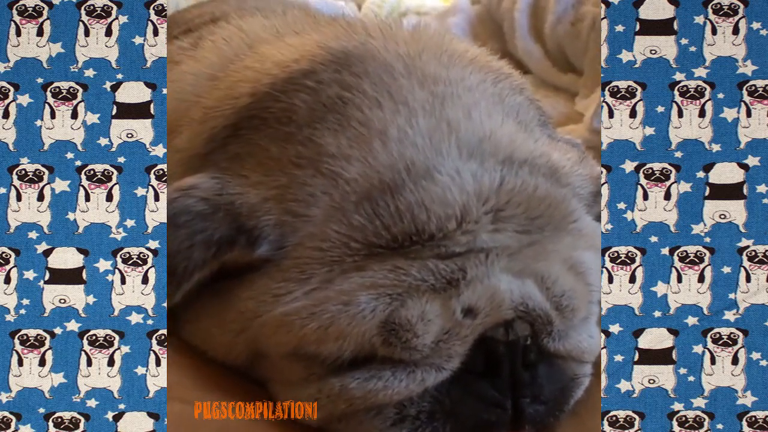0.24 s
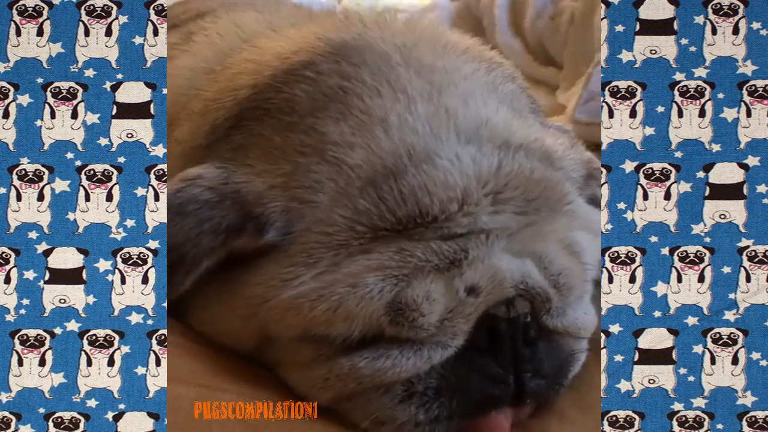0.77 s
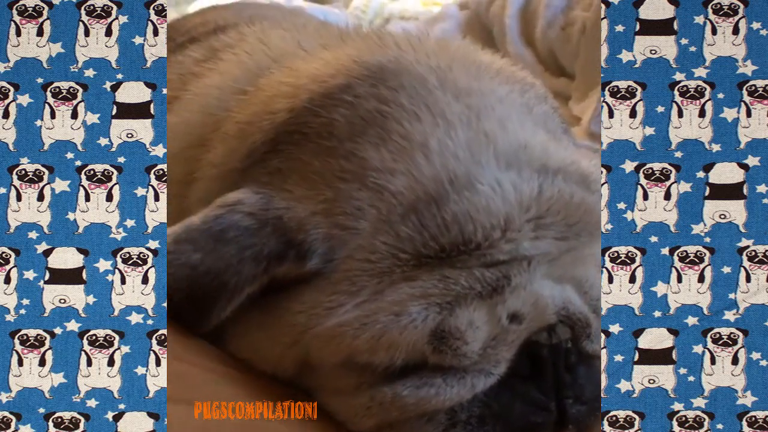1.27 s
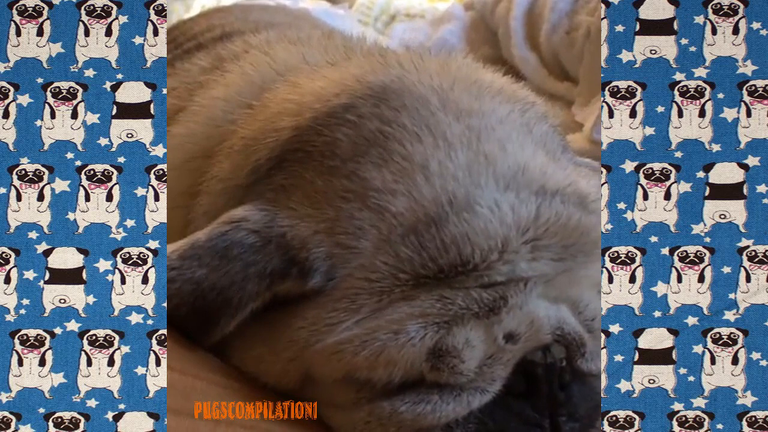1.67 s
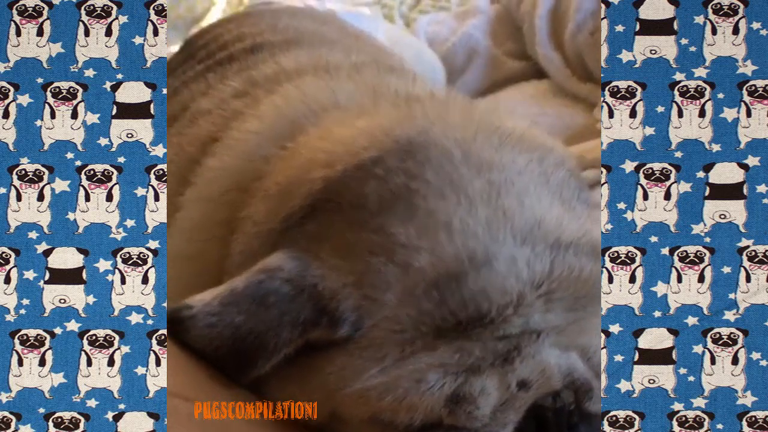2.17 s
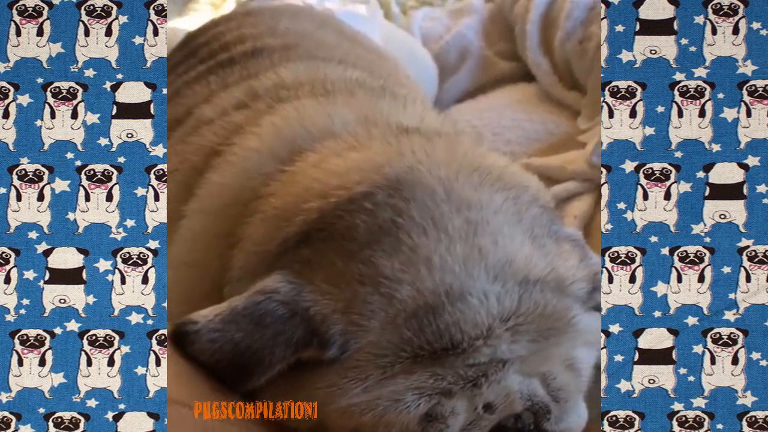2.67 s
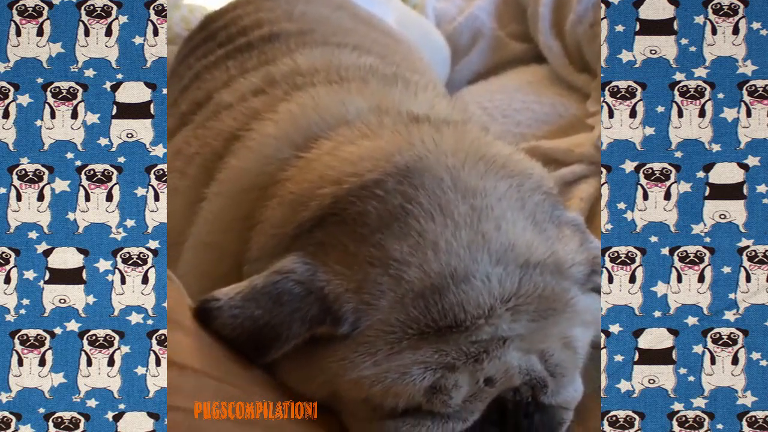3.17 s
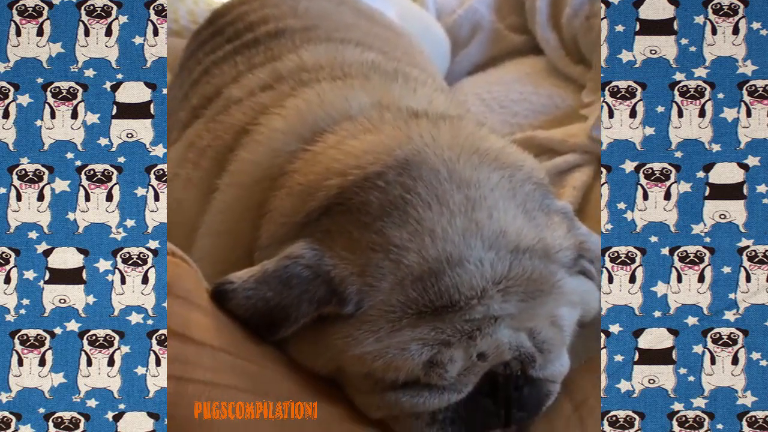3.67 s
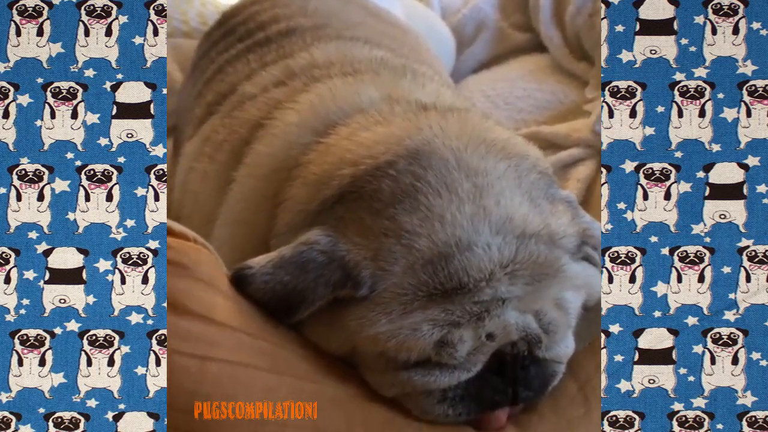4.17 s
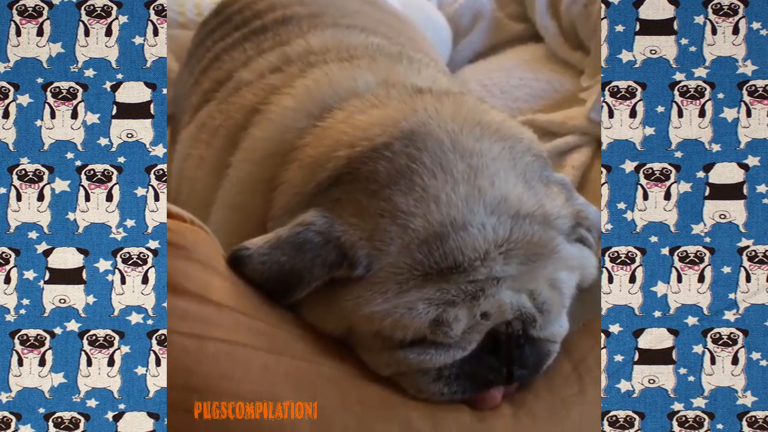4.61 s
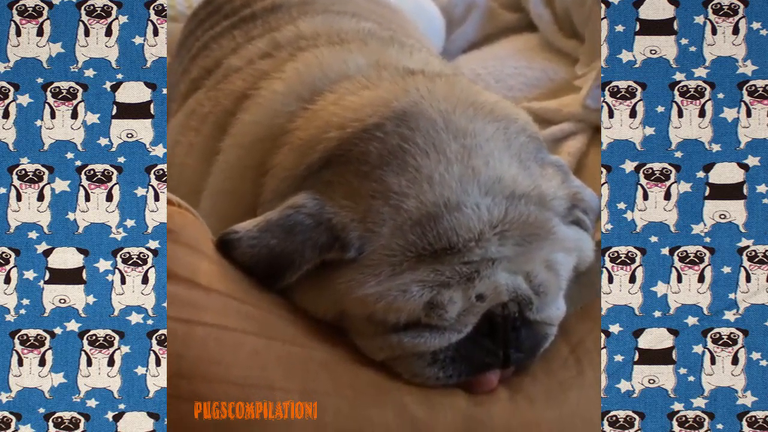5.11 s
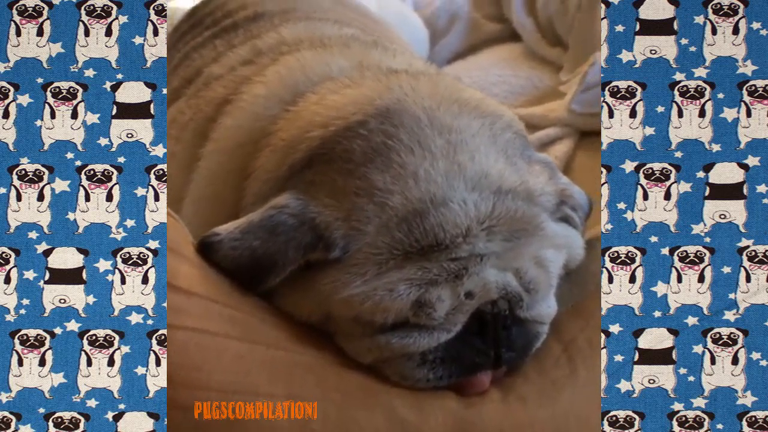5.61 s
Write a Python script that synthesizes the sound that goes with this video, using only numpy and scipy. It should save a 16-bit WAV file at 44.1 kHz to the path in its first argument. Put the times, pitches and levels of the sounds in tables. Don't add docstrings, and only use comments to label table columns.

```python
import sys
import numpy as np
from scipy import signal
from scipy.fft import rfft, irfft, next_fast_len
from scipy.io import wavfile
from scipy.ndimage import uniform_filter1d

SR = 44100
rng = np.random.default_rng(int(sys.argv[2]) if len(sys.argv) > 2 else 0)


def pcm_store(signal):
    levels = np.round(np.clip(np.atleast_2d(signal), -1, 1) * 32767)
    wavfile.write(sys.argv[1], SR, levels.astype(np.int16).T)


def gain_from_db(level_db):
    decades = np.asarray(level_db, float) / 20
    return 10 ** decades


N = 257984
T = np.arange(N) / SR
COARSE = T[::128]
SIZE = next_fast_len(N)
F = np.fft.rfftfreq(SIZE, 1 / SR)


def curves(table):
    s, *columns = np.transpose(table)
    return [np.interp(T, s, c) for c in columns]


def unit(x):
    return x / np.sqrt(np.mean(x ** 2))


def walk(rate):
    hop = 64
    k = int(SR / hop / rate)
    held = np.repeat(rng.standard_normal(N // hop // k + 2), k)
    slewed = uniform_filter1d(uniform_filter1d(held, k), k)
    return np.interp(T, np.arange(len(held)) * hop / SR, unit(slewed))


def beam(s, spread, t=T):
    return np.exp(-.5 * ((t - s) / spread) ** 2)


def swells(rows):
    gain = sum(gain_from_db(db) * beam(s, spread, COARSE) for s, db, spread in rows)
    return np.interp(T, COARSE, gain)


def bumps(rows):
    change_db = sum(db * beam(s, spread, COARSE) for s, db, spread in rows)
    return np.interp(T, COARSE, change_db)


def narrow(bands):
    shape = sum(gain_from_db(db) * np.exp(-2 * ((F - hz) / width) ** 2) for hz, width, db in bands)
    return unit(irfft(rfft(rng.standard_normal(SIZE)) * shape, SIZE)[:N])


def noise(colour, flicker_db, rate):
    hz, db = np.transpose(colour)
    octave = np.log2(np.maximum(F, 1))
    colour_db = np.interp(octave, np.log2(hz), db, left=-99, right=-99)
    spectrum = rfft(rng.standard_normal(SIZE)) * gain_from_db(colour_db)
    out = 0
    for centre in np.arange(np.log2(hz[0]), np.log2(hz[-1]) + 1 / 3, 1 / 3):
        band = np.clip(1 - 3 * np.abs(octave - centre), 0, 1)
        out = out + irfft(spectrum * band, SIZE)[:N] * gain_from_db(flicker_db * walk(rate))
    return unit(out)


def tone(hz, wobble, flutter_db, rate):
    phase = 2 * np.pi * (np.cumsum(hz) / SR + rng.random()) + wobble * walk(rate)
    return np.sqrt(2) * np.sin(phase) * gain_from_db(flutter_db * walk(rate))


# [start_s, level_db, spread_s]
INSECT_PHRASES = [
    (.04, -75.5, 0.066),
    (.2, -74, .02),
    (.35, -77, 0.063),
    (.62, -74, 0.17),
    (1.0, -82, .1),
    (1.3, -77.5, .1),
]
# [pitch_hz, width_hz, level_db]
WING_BANDS = [
    (10000, 750, 1),
    (6600, 800, -3),
    (13200, 1200, -7),
]


def insect():
    throb = gain_from_db(2.5 + 1.5 * walk(11.5))
    fade = np.clip((1.5 - T) / .15, 0, 1)
    return swells(INSECT_PHRASES) * throb * fade * narrow(WING_BANDS)


# [start_s, level_db, pitch_hz, fade_by_60_db_s, pitch_fall_hz_per_s]
ROOM_KNOCKS = [
    (0.0011, -32.5, 466, 0.028, 10),
    (.088, -40, 410, 0.26, 1540),
    (.001, -36, 704, .03, 10),
    (.181, -37, 600, 0.038, 10),
    (1.611, -30.5, 1080, 0.029, 10),
    (1.208, -36, 1040, .06, 10),
    (1.33, -38, 1020, .07, 10),
    (1.56, -42, 990, .07, 10),
]


def knocks():
    out = 0
    for s, db, hz, t60, fall in ROOM_KNOCKS:
        age = np.maximum(T - s, 0)
        swell = 1 - np.exp(-age / .003)
        ring = np.sin(2 * np.pi * (hz - fall * age / 2) * age)
        out = out + gain_from_db(db - 60 * age / t60) * swell * ring
    return out


# [time_s, level_db]
CAR_PASS = [
    (0, -65.5),
    (.4, -57),
    (.9, -50.5),
    (1.4, -53),
    (1.8, -53),
    (2.2, -55),
    (5.85, -90),
]
# [pitch_hz, level_db_per_hz]
CAR_COLOUR = [(600, -28), (950, -1.5), (1100, 0), (1400, -2.5), (1900, -14.5), (3000, -19), (4500, -34)]


def car():
    return gain_from_db(curves(CAR_PASS)[0]) * noise(CAR_COLOUR, flicker_db=1.5, rate=8.6)


# [pitch_hz, width_hz,
# level_db, loudest_s, spread_s]
TREAD_HUMS = [(1420, 74, -56, 1.01, 0.11), (1205, 50, -58, 0.8, 0.15), (1005, 77, -53.5, 1.24, 0.091),
              (1370, 45, -66, 1, .15), (984, 80, -56, 0.77, .08), (1830, 100, -65, 0.87, .1),
              (950, 140, -52, 2.65, 0.26), (1000, 99, -51.5, 3.1, 0.21), (3760, 630, -58, 3.04, 0.13),
              (580, 130, -52, 3.62, 0.2), (634, 130, -59, 5.73, 0.59), (300, 62, -54.5, 0.24, 0.054),
              (2720, 660, -66, 4.66, 0.47), (1000, 500, -53, 3.5, 0.21), (1160, 530, -50.5, 4.04, 0.18),
              (354, 71, -50.5, 3.4, .15), (850, 430, -62.5, 5.9, 0.46), (290, 53, -53, 1.02, 0.1),
              (260, 70, -47, 2.75, 0.11), (1490, 500, -58, 2.33, .2), (2600, 610, -64, 4.15, .25),
              (36, 18, -59, 5.2, .3), (36, 18, -63, .4, .3), (1000, 180, -51.5, 3.28, .08),
              (850, 250, -52, 3.5, .1), (1195, 40, -58, .87, .05), (1400, 200, -60, 1.28, .07),
              (550, 200, -53, 3.95, .06), (1750, 200, -61, 3.4, 0.11), (2310, 300, -64, 3.3, .3),
              (230, 50, -44, 2.7, .04), (600, 200, -58, 4.7, .2), (212, 25, -49.5, 5.62, 0.14),
              (1540, 440, -56, 3.92, 0.11), (1060, 160, -62, 3.5, .06), (270, 50, -49, 2.72, 0.053),
              (1020, 37, -56, 1.34, .06), (1000, 300, -59.5, 1.9, .12), (60, 14, -46, 2.95, .07),
              (42, 16, -46, 3.41, .04)]


def treads():
    return sum(gain_from_db(db) * beam(s, spread) * narrow([(hz, width, 0)]) for hz, width, db, s, spread in TREAD_HUMS)


# [time_s, level_db below its closest approach]
NEARNESS = [(0, -17.5), (.7, -13), (1.3, -10.5), (1.8, -9.5), (2.3, -5), (2.7, -0.5), (3.05, -1), (3.5, -1),
            (3.8, -3.5), (4.2, -7.5), (5.0, -14), (5.85, -18.5)]
LAYER_LEVELS = {"low": (-52, 0.57, 0.01), "octave": (-61, 0.58, 0.01), "whine": (-75, 0.54, .01),
                "rumble": (-44.5, 0.68, .1), "roar": (-42.5, 0.51, .05), "tread": (-46, 0.79, 0.17),
                "hiss": (-54.5, 0.98, .01)}


def follow(name):
    top_db, slope, lag = LAYER_LEVELS[name]
    s, db = np.transpose(NEARNESS)
    return top_db + slope * np.interp(T - lag, s, db)


# [pitch_hz, level_db_per_hz]
RUMBLE_COLOUR = [(20, -15), (40, -7.5), (60, -3.5), (110, -5.5), (160, -15.5)]
ROAR_COLOUR = [(70, -9.5), (110, -1.5), (170, -2.5), (240, 2), (300, -10.5), (450, -19.5), (600, -34)]
TREAD_COLOUR = [(180, -32), (300, -2.5), (336, -11), (408, -4), (539, -6.5), (988, -8), (1120, -10),
                (1740, -13), (3500, -27.5), (4550, -36), (7700, -120)]
HISS_COLOUR = [(1290, -55), (2200, -1.5), (2360, -0.5), (3160, -11), (3960, -6), (6060, -9.5), (6910, -13),
               (12200, -22), (14000, -27)]
# [time_s, change_db, spread_s]
BODY_LURCHES = [(.03, -8, .1), (1.16, -5, .05), (2.0, 3.5, 0.11), (2.41, -4, .05), (2.7, 8, 0.046),
                (2.81, -9, .03), (2.93, 5, .07), (3.39, 7, 0.048), (3.5, -14, .03), (3.68, -7, .04),
                (3.89, -8, .05), (4.12, -15, 0.032), (4.35, -11, 0.033), (4.5, 4, .15), (5.65, 3, .03),
                (5.78, 4, .03)]
# [time_s, change_db, spread_s]
EXHAUST_GULPS = [(.07, -3.5, .04), (.31, 3, 0.076), (1.16, 1, 0.042), (1.9, 1.5, .03), (2.52, 4.5, .03),
                 (2.69, 4, 0.023), (3.5, 7, 0.043), (3.68, 2.5, 0.026), (3.76, -4, 0.027),
                 (4.12, -8, 0.027), (4.2, 2, .03), (4.42, -7.5, 0.24), (5.4, 3, 0.12), (5.65, -1, .08)]
# [time_s, change_db, spread_s]
TARMAC_PATCHES = [(.5, 1.5, 0.18), (.95, -1, .08), (1.32, 2.5, 0.05), (2.0, -1, 0.14), (2.55, 0, .05),
                  (2.75, -1, .06), (3.1, 1, .08), (3.38, 1.5, 0.046), (3.6, -0.5, 0.11), (4.2, 1, 0.03),
                  (4.12, -1.5, .04)]


def road():
    tarmac_db = bumps(TARMAC_PATCHES)
    rumble_db = follow("rumble") + bumps(BODY_LURCHES)
    roar_db = follow("roar") + bumps(EXHAUST_GULPS)
    tread_db = follow("tread") + 0.26 * tarmac_db
    hiss_db = follow("hiss") + tarmac_db
    out = gain_from_db(rumble_db + 3.5) * noise(RUMBLE_COLOUR, flicker_db=1.3, rate=9)
    out += gain_from_db(roar_db + 1.5) * noise(ROAR_COLOUR, flicker_db=1.5, rate=12)
    out += gain_from_db(tread_db + 5.5) * noise(TREAD_COLOUR, flicker_db=1.5, rate=8)
    grain_db = .4 * walk(18)
    out += gain_from_db(hiss_db + 2.5 + grain_db) * noise(HISS_COLOUR, flicker_db=1.1, rate=15)
    near_db = 1.63 * (hiss_db - hiss_db.max())
    return out + gain_from_db(near_db - 63.5 + 1.5 * walk(16)) * narrow([(11500, 10500, 0)])


WHINE_MULTIPLES = [
    3.105,
    3.33,
    3.548,
    3.98,
]
# [time_s, level_db, spread_s]
WHINE_SWELLS = [
    [(.8, -62, 0.09), (1.35, -60, 0.23), (2.0, -57, 0.13), (2.45, -49.5, 0.13), (2.78, -47.5, 0.13),
     (3.5, -52.5, 0.12), (3.77, -43, .1), (4.22, -47.5, 0.11), (4.55, -55.5, 0.14), (5.0, -50, 0.11),
     (5.55, -59, 0.18), (5.85, -49, 0.05)],
    [(1.0, -60.5, 0.084), (2.0, -59, 0.13), (2.6, -61, 0.11), (3.3, -62, .15), (3.73, -43.5, .13),
     (4.0, -53, .1), (4.33, -51, 0.14), (4.75, -53.5, .17), (5.8, -56, 0.072)],
    [(1.0, -65, .1), (1.75, -55.5, .13), (2.45, -52, 0.27), (3.7, -53.5, 0.23), (4.1, -53, 0.22),
     (4.85, -58, 0.13), (5.55, -59, 0.11)],
    [(1.1, -64, .3), (2.0, -62, .1), (3.3, -68, .15), (3.82, -50.5, 0.13), (4.25, -54.5, 0.25),
     (4.8, -62, .08), (5.2, -61, .08)],
]
# [multiple of the firing rate, level_db, loudest_s, spread_s]
PASSING_PARTIALS = [(4 / 3, -57, 1.3, 1.1), (4 / 3, -48, 2.4, .12), (4 / 3, -49, 4.2, .5),
                    (5 / 3, -51, 2.9, .5), (5 / 3, -53, 4.55, .12), (5 / 3, -51, 5.25, .25),
                    (.45, -47, 2.7, .25), (1 / 3, -48, 3.2, .25), (1.78, -51, 1.1, .35),
                    (2.5, -57, 1.2, .2), (2.23, -57, 5.0, .35), (4.7, -53, 3.7, .12), (4.98, -57, 4.1, .25),
                    (4.75, -65, 5.2, .4), (6.8, -57, 4.1, .25), (10.9, -60, 3.7, .2),
                    (12.27, -56, 4.25, .22), (13.55, -58, 3.55, .15), (13.73, -61, 4.15, .25),
                    (17.1, -63, 4.2, .22), (18.45, -61, 3.8, .1)]


def gears(hz):
    out = 0
    for multiple, rows in zip(WHINE_MULTIPLES, WHINE_SWELLS):
        gain = gain_from_db(follow("whine")) + swells(rows)
        out = out + gain * tone(hz * multiple, wobble=.2, flutter_db=1.6, rate=12)
    for multiple, db, s, spread in PASSING_PARTIALS:
        out += gain_from_db(db) * beam(s, spread) * tone(hz * multiple, wobble=.9, flutter_db=2.5, rate=22)
    return out


# [time_s, level_db]
FIRING_LEVEL = [(0, -65), (.2, -49.5), (.35, -42), (.62, -51), (.8, -48.5), (.9, -38), (1.15, -44.5),
                (1.42, -37.5), (1.7, -40), (2.0, -38), (2.4, -29), (2.5, -29.5), (2.95, -20.5), (3.2, -28),
                (3.5, -25.5), (3.8, -32), (4.95, -33), (5.15, -43.5)]
# [time_s, change_db, spread_s]
ECHO_NULLS = [(.7, 4, .04), (1.29, -14, 0.057), (2.1, -12.5, 0.031), (3.29, -18, 0.047),
              (4.12, -4.5, 0.079), (4.5, -5.5, .05), (4.7, 2, 0.061), (5.3, -1, 0.029), (5.7, 4, 0.21)]
# [time_s, firing_swell_db, thump_db]
ROAD_JOLTS = [(2.68, 3.5, -34), (2.745, 4, -36), (2.82, 2, -46), (2.886, 4, -25), (2.97, 3.5, -36),
              (3.02, 2, -36), (3.42, 0.5, -37), (3.49, -1, -36), (3.97, 4, -38), (4.21, 3, -43),
              (1.39, 4.5, -42), (3.35, 3, -33), (3.53, -4, -50), (3.58, 1.5, -36), (4.26, -3, -48),
              (4.35, 2, -45), (4.45, 3, -44), (4.51, 0.5, -50), (4.91, 3.5, -36), (2.40, 1.5, -41)]
# [time_s, level_db, spread_s]
TWO_THIRDS_SWELLS = [(.2, -53, 0.22), (.7, -50.5, 0.099), (.97, -45, .09), (1.2, -43, 0.07),
                     (1.43, -41.5, 0.082), (2.02, -43, 0.08), (2.19, -37, .05), (2.42, -38, 0.07),
                     (2.72, -39, 0.16), (3.2, -33.5, 0.08), (3.38, -32.5, .06), (3.72, -41, 0.065),
                     (4.0, -49, 0.03), (4.32, -47, 0.079), (4.69, -40, 0.094), (4.93, -42, 0.073),
                     (5.15, -46.5, 0.12), (5.5, -53, .07)]
OCTAVE_TONE_SWELLS = [(.85, -52.5, 0.1), (1.2, -46.5, 0.039), (1.5, -50.5, .05), (1.9, -43, 0.076),
                      (2.09, -45, 0.057), (2.55, -42.5, 0.11), (2.7, -44, 0.068), (2.92, -42.5, 0.085),
                      (3.1, -49, 0.036), (3.44, -37.5, 0.081), (3.75, -47, 0.081), (4.33, -57, 0.052),
                      (4.9, -51.5, .05), (5.3, -57, 0.052), (5.6, -53.5, .05), (5.85, -58, 0.046)]


def engine(hz):
    fire_db = curves(FIRING_LEVEL)[0] + bumps(ECHO_NULLS)
    out = 0
    for s, swell_db, thump_db in ROAD_JOLTS:
        age = np.maximum(T - s, 0)
        fire_db = fire_db + swell_db * (2 * beam(s + 0.0042, 0.018) - beam(s, 0.045))
        out = out + gain_from_db(thump_db) * np.exp(-age / 0.014) * np.sin(2 * np.pi * 75 * age)
    out += gain_from_db(fire_db) * tone(hz, wobble=0.24, flutter_db=1.0, rate=22)
    low_gain = gain_from_db(follow("low")) + swells(TWO_THIRDS_SWELLS)
    out += low_gain * tone(hz * 2 / 3, wobble=0.6, flutter_db=2.0, rate=16)
    octave_gain = gain_from_db(follow("octave")) + swells(OCTAVE_TONE_SWELLS)
    out += octave_gain * tone(hz * 2, wobble=0.9, flutter_db=2.5, rate=18)
    return out


# [time_s, pitch_hz]
FIRING_RATE = [(0, 131.5), (.7, 132.6), (1.45, 132.8), (2.0, 133.7), (2.45, 133.2), (2.7, 132.6),
               (2.95, 131.6), (3.2, 130.3), (3.45, 127.8), (3.7, 126.6), (4.2, 125.8), (4.7, 126),
               (5.2, 126.6), (5.85, 126.6)]


def scene():
    background = insect() + knocks() + car()
    hz = curves(FIRING_RATE)[0]
    lorry = road() + gears(hz) + engine(hz)
    return (background + treads() + lorry)[None]


def roll_off(x):
    return signal.sosfilt(signal.butter(12, 13980, fs=SR, output="sos"), x)


# [low_hz, high_hz, start_s, end_s, rarity in spreads]
TREBLE_GAPS = [(11000, 11700, .15, .86, -.9), (11700, 12400, 0, .08, -3), (11700, 12400, .1, 1.7, .9),
               (11700, 12400, 1.78, 1.87, -3), (11000, 11700, .86, 2.1, 1.1), (10400, 11000, .4, 2.1, 1.5),
               (13650, 14000, 0, 5.85, .7), (13300, 13650, 0, 5.85, .8), (13000, 13300, 2.4, 5.85, 1.2),
               (12500, 13300, 3.25, 3.29, -3), (8900, 9150, 4.25, 4.95, .9), (8600, 8900, 2.8, 5.0, 1.2),
               (8300, 8600, 3.3, 5.0, 1.3), (8300, 8800, .1, .9, 1.4)]


def record(dry):
    spectrum, out = rfft(dry, SIZE), dry.copy()
    for low, high, start, until, rare in TREBLE_GAPS:
        gap = 1. * (walk(70) > rare) * (T >= start) * (T < until)
        off = uniform_filter1d(gap, size=300)
        band = irfft(spectrum * ((F > low) & (F < high)), SIZE)[:, :N]
        out -= off * band
    return roll_off(out)


dry = scene()
out = record(dry)
pcm_store(out)
```